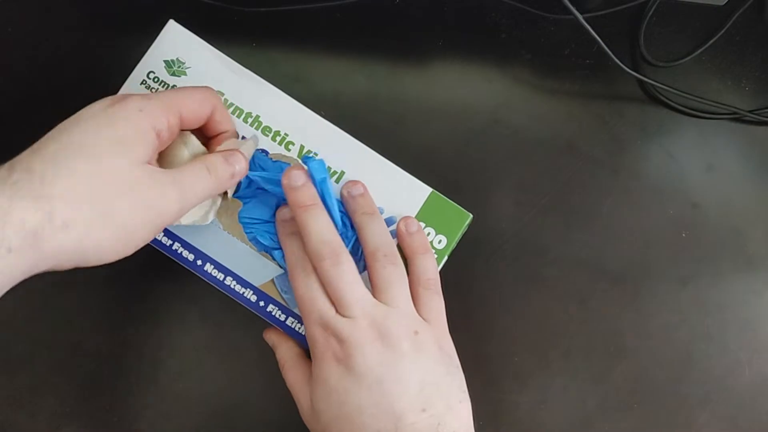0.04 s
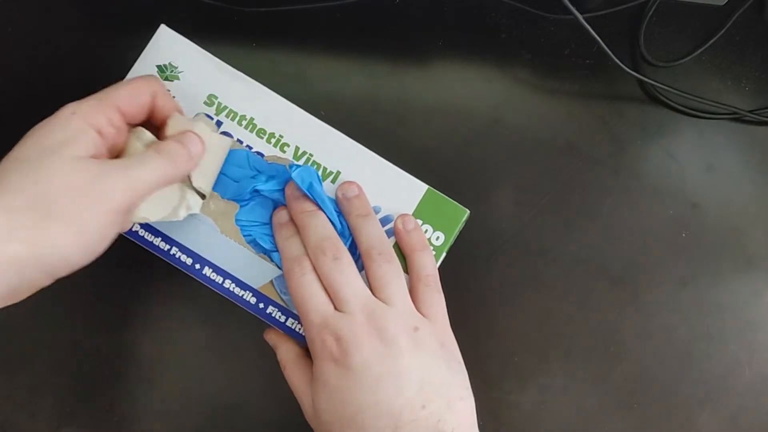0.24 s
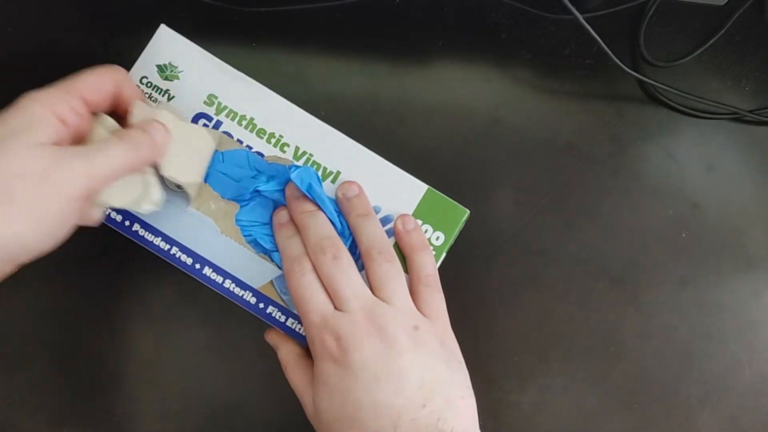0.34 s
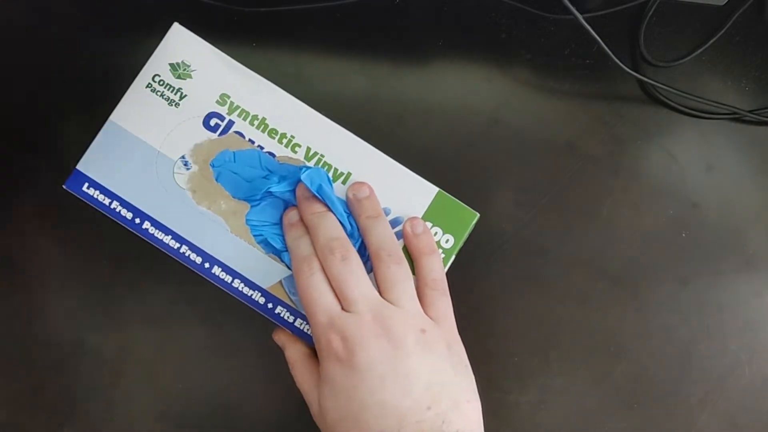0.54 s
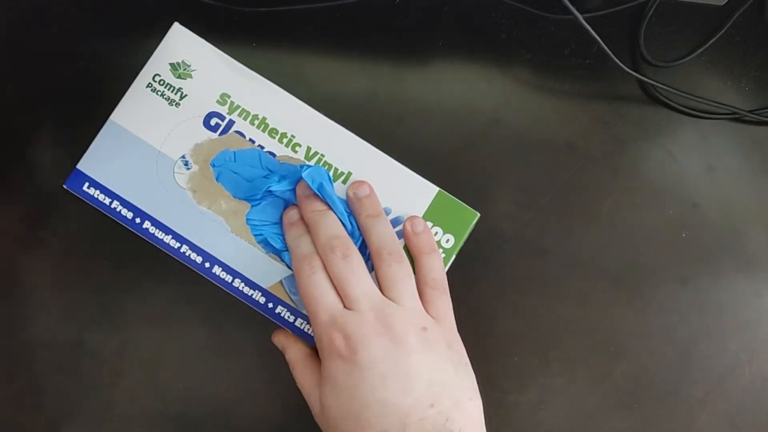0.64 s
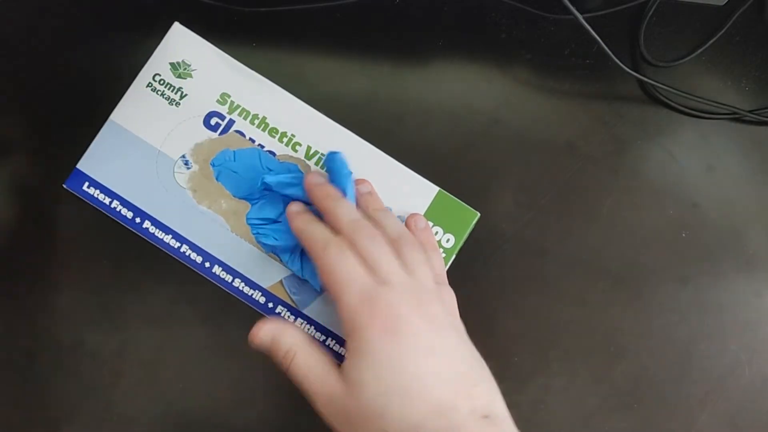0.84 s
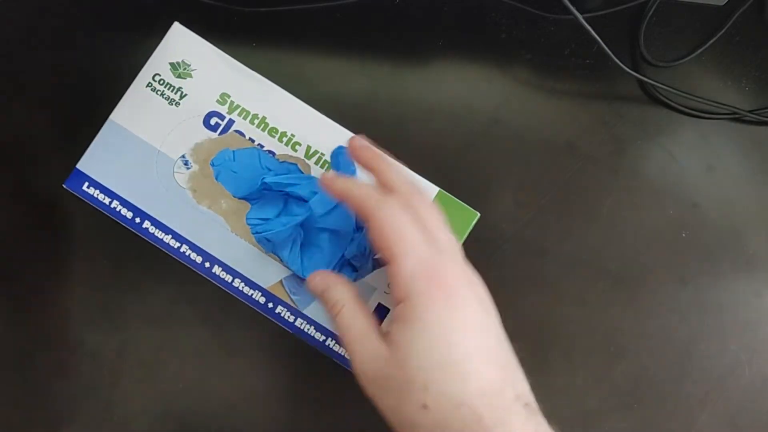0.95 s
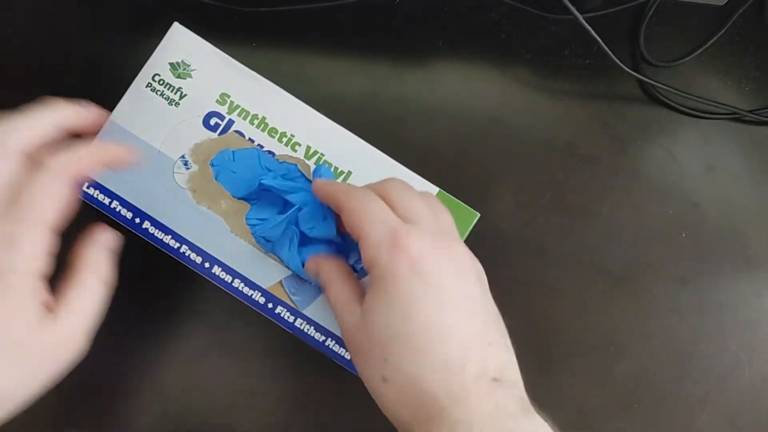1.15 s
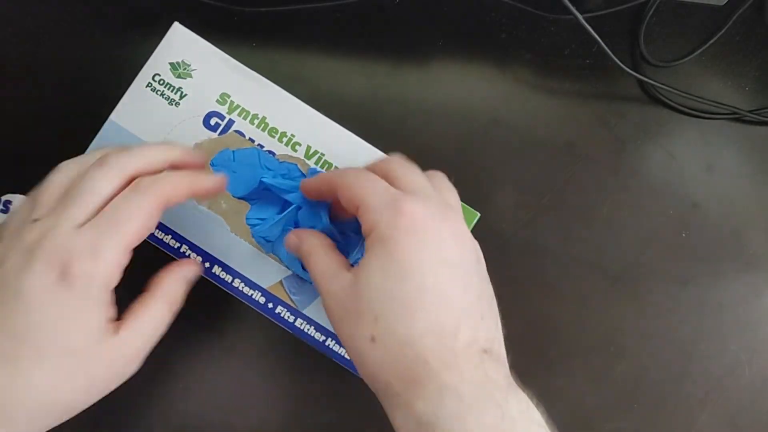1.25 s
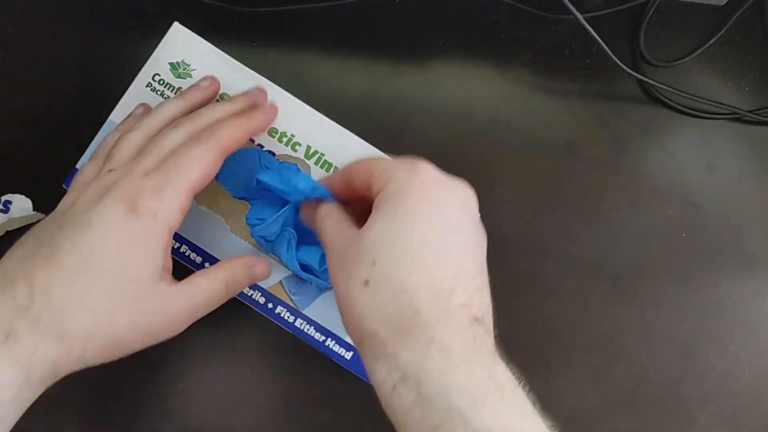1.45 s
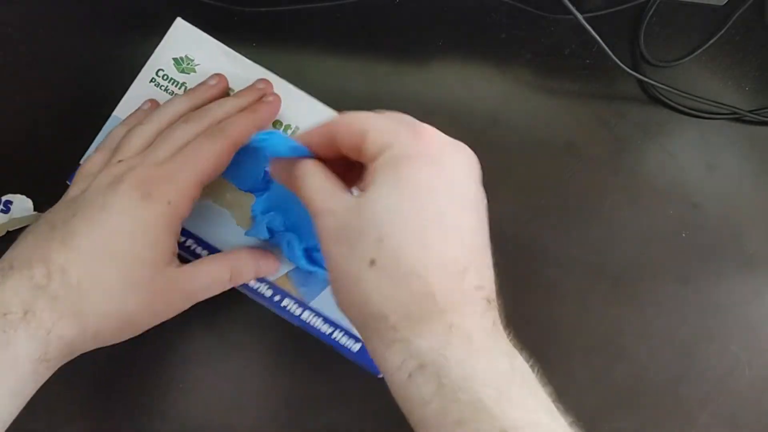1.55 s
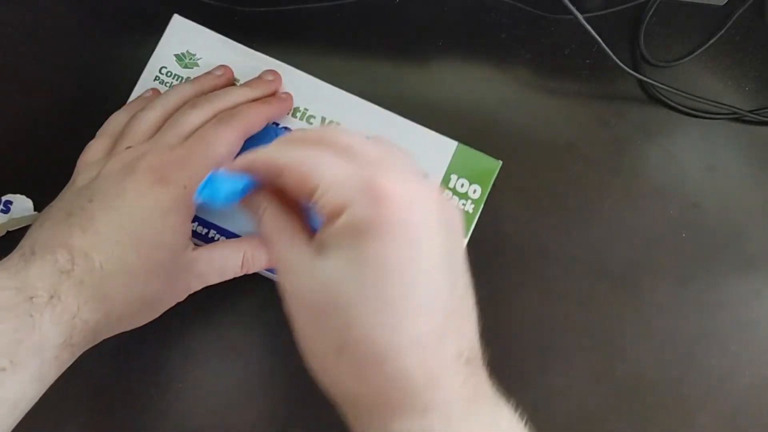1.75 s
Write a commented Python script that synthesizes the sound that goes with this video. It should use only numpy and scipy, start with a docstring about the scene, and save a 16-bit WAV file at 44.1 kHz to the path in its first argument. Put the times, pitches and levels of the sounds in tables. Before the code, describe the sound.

Close up at a desk, card tears in a rough burst ending in a loud hollow pop, then fingers lightly stir thin plastic gloves with small ticks, soft thuds and low room noise.

```python
"""A cardboard flap is torn off a box of thin plastic gloves on a desk, dropped aside, and fingers stir the gloves.
Tear and gloves are showers of tiny ringing grains; slips and jolts shake the hollow box, and snaps ring briefly.
A fuzzy whistle on the left is noise in a narrow, wandering band; soft thuds through the desk are fading low tones.
The near sounds get a faint echo of the room; low rumble and airy noise, the quiet hum of the room, lie under it all."""
import sys
import numpy as np
from scipy import signal
from scipy.fft import rfft, irfft
from scipy.io import wavfile
from scipy.ndimage import uniform_filter1d

SR = 44100
rng = np.random.default_rng(int(sys.argv[2]) if len(sys.argv) > 2 else 0)


def voltage_ratio(decibels):
    """Convert decibels (scalar or array-like) to amplitude ratios, 20 dB per decade."""
    exponent = np.asarray(decibels, float) / 20
    return 10 ** exponent


def int16_out(signal):
    """Quantize to a 16-bit WAV file."""
    q = np.round(np.clip(np.atleast_2d(signal).T, -1, 1) * 32767)
    wavfile.write(sys.argv[1], SR, q.astype(np.int16))


N = 79380  # length in samples
T = np.arange(N) / SR  # time in seconds

# crackle of tearing card, then of rustling plastic:
# (time [s], level above SPLIT_HZ [dB], level below SPLIT_HZ relative to that [dB])
CRACKLE = [(0, -67, 10.5), (.068, -65, 6), (.078, -54, -5), (.17, -50.5, -9.5), (.192, -40, -0.5),
           (.224, -41, 4.5), (.27, -38, 2.5), (.315, -45.5, 4), (.35, -33.5, -0.5), (.372, -36.5, -1.5),
           (.39, -35.5, -3.5), (.43, -30.5, 0.5), (.46, -27, 0), (.49, -45.5, -6.5), (.56, -66.5, 4.5),
           (.65, -68.5, -5), (.684, -44, -18.5), (.735, -58.5, 1), (.85, -65.5, 0), (.862, -50.5, -6),
           (.899, -52, 1), (.905, -39.5, -7), (.962, -66, 4), (1.042, -74.5, 9.5), (1.09, -63.5, -5),
           (1.132, -54, -8), (1.198, -67, -4), (1.298, -60.5, -8), (1.33, -68.5, -6), (1.426, -66.5, -20),
           (1.43, -53.5, -5), (1.47, -55, -12.5), (1.524, -63, -1), (1.544, -60, -6.5), (1.64, -66, 5.5),
           (1.67, -75.5, -8), (1.73, -75, 7), (1.745, -66.5, -0.5), (1.8, -71, 1)]
# tone colour of the tearing card: (frequency [Hz], relative level per Hz [dB])
TEAR_COLOUR = [(410, -61), (700, -13), (788, -19.5), (1040, -11), (1160, -13.5), (2450, -3.5), (3070, -8),
               (6100, -4), (7630, -11), (15200, -9), (16400, -63)]
# tone colour of the rustling gloves: (frequency [Hz], relative level per Hz [dB])
GLOVE_COLOUR = [(410, 14.5), (700, 5.5), (1200, 0), (1690, 4.5), (4050, -4), (4440, -5.5), (6770, -1.5),
                (8040, -16), (9060, -10), (15000, -12), (16400, -37)]
# how alike the tear is on left and right: (frequency [Hz], likeness [-1 to 1])
TEAR_LIKENESS = [(60, 0.95), (180, 0.97), (550, 0.093), (1650, 0.43), (4970, -0.44), (15000, 0.56)]
# side balance of the tear: (frequency [Hz], left minus right [dB])
TEAR_BALANCE = [(60, 5), (380, 0), (2380, -1), (15000, 4)]
# how far the left channel of the tear leads the right: (frequency [Hz], phase [radians])
TEAR_LEAD = [(0, 2), (2410, 0), (7490, 9), (9560, 8), (11500, 12.5), (13300, 7.5), (16200, -25)]
# how alike gloves and air are on left and right: (frequency [Hz], likeness [-1 to 1])
WIDE_LIKENESS = [(60, 1), (240, 0.99), (950, 0.21), (3770, 0.093), (15000, 0.021)]
SPLIT_HZ, GRAIN_CYCLES = 3280, 1.92
GRAINS_PER_S, GRAIN_SPREAD_DB = 500, 3  # grains a second at 3000 Hz, in proportion to pitch elsewhere
PATCH_DB, CLUMP_DB = 1.8, 1.5  # uneven level of each grain size, and of the whole crackle
TORN_S = 0.449  # the tear gives way to the gloves

# pitches of the ways the box vibrates, its modes: [Hz]
BOX_HZ = [295, 342, 354, 440, 515, 645, 695, 945, 1053, 1224, 1590]
# one row for each pitch in BOX_HZ: (level relative to its group [dB], time to fade by 60 dB [s])
BOX_RING = [(-11.5, 0.047), (9, 0.048), (-5, 0.31), (4.5, 0.093), (-10, 0.029), (-4.5, 0.1), (-14, 0.11),
            (-12.5, 0.091), (-8.5, 0.098), (-17, 0.066), (-1, 0.026)]
# shaking of the box by tear and hands, before the cuts in box():
# (time [s], middle and high modes [dB], deep modes [dB])
SHAKE = [(0.0, -56, -90), (0.064, -52, -40.5), (0.124, -54, -64), (0.21, -44, -45), (0.32, -47.5, -61),
         (0.354, -39, -72), (0.4, -28.5, -48), (0.45, -23.5, -22.5), (0.486, -62, -34.5),
         (0.56, -58.5, -65.5), (1.8, -81, -76)]
# jolts of the box, before the cut in box():
# (time [s], peak of middle modes [dB], deep relative to middle [dB], high relative to middle [dB])
JOLTS = [(0.056, -42.5, 13, -19), (.191, -39, -27, -13), (0.241, -30, -9.5, -9.5), (.349, -24, -29, -13),
         (.376, -25, -34, -2), (.381, -35.5, -19, 6), (.394, -26.5, -9, -31), (.412, -20.5, -0.5, -7.5),
         (.422, -34.5, 17, 2), (0.43, -15, -2.5, -2), (.443, -7.5, -24, -9.5), (.451, -17, 12, -4.5),
         (1.496, -47, 3.5, -12), (1.62, -48, 1, -9), (1.645, -52.5, 9, -9), (1.738, -56, 8, -4)]
DEEP_HZ, HIGH_HZ = 390, 580  # deep modes lie below the first, high modes above the second
BOX_LOW_HZ = 262  # the box gives off little below this
SLIPS_PER_S, JOLT_RISE_S = 1500, 0.0031
BOX_PAN_DB, BOX_LAG_S = 3, 0.00015  # left minus right; the left side comes later
# the hand on the box chokes the middle and deep ring after this time, down to this level
HELD_S, AFTER_DB = 0.011, -13

# short snaps: (time [s], level [dB], pitch [Hz], left minus right [dB],
# time for the ring to fade by 60 dB [s], wide tick relative to ring before the cut in snaps() [dB])
SNAPS = [(0.014, -50.5, 6850, 3, 0.027, 16), (0.0752, -38, 9830, 20, 0.0081, -5),
         (0.1046, -45.5, 4760, 2, 0.045, 9), (0.181, -39, 9300, 19, 0.01, -6),
         (0.3547, -40, 3050, 11, 0.044, 0), (0.602, -48.5, 2370, -3, 0.0066, 4),
         (0.6826, -49, 2310, 14, 0.035, -5), (0.6983, -37, 2340, 10.5, 0.03, -13),
         (0.6972, -31.5, 4120, -3.5, 0.0094, -26.5), (.784, -41, 1375, 8, 0.081, -27),
         (.784, -50, 1624, 1, 0.073, -25), (0.8104, -47.5, 3750, 8, 0.018, 8),
         (0.8703, -57, 2360, -15, 0.27, -4), (0.8996, -29.5, 2386, -14, 0.023, -13),
         (.8996, -39, 3760, 18, 0.023, -15), (0.9062, -34, 2444, -4.5, 0.089, 0),
         (1.299, -57.5, 6850, -9, 0.042, 17), (1.43, -54, 3860, 0, 0.012, 8),
         (1.452, -49.5, 2000, 6, 0.013, 19), (1.308, -51, 1720, 2, 0.012, 15),
         (1.622, -52.5, 1070, -4.5, 0.015, 3), (1.537, -47, 6760, 3, 0.038, 15),
         (1.533, -57.5, 5920, -12, 0.079, 8), (1.7365, -52, 890, 3, 0.015, -4)]
TICK_T60 = 0.009  # seconds for a tick to fade by 60 dB

# fuzzy whistle, one list for each stretch: (time [s], pitch [Hz], level [dB])
WHISTLE = [
    [(0, 1360, -47.5), (.086, 1374, -61.5), (.124, 1440, -51), (.168, 1386, -53), (.24, 1350, -51)],
    [(.56, 1340, -54.5), (.62, 1380, -65), (.7, 1310, -77), (.72, 1330, -52.5), (.75, 1394, -51),
     (.775, 1270, -61.5), (.803, 1360, -57), (.82, 1330, -53.5), (.862, 1295, -52.5), (.88, 1460, -65),
     (.897, 1376, -44), (.915, 1280, -73), (.962, 1320, -65), (.975, 1260, -60.5), (1.018, 1350, -50),
     (1.07, 1260, -64)],
]
WHISTLE_WIDTH_HZ, WHISTLE_PAN_DB = 85, 9.5  # width of one resonance; left minus right
WHISTLE_STEADY = 0.5  # 0 leaves the swells, 1 flattens them

# soft thuds through the desk: (time [s], level [dB], pitch [Hz])
THUDS = [(0.456, -50, 162), (0.647, -51.5, 71), (1.055, -44.5, 146), (1.104, -46.5, 122.7),
         (1.144, -52, 119), (1.54, -50, 63)]
THUD_T60 = 0.19  # seconds to fade by 60 dB

# fading of the room's echo: (frequency [Hz], time to fade by 60 dB [s])
ROOM = [(250, 0.14), (1000, 0.079), (4000, 0.18), (12000, 0.11)]
ROOM_DB, SNAP_ECHO_DB = -13, -7.5  # level sent to the echo: crackle and box, then snaps

# low rumble, before the cut in rumble(): (time [s], level [dB])
RUMBLE = [(0.0, -54), (0.334, -66.5), (0.466, -48.5), (0.516, -61), (0.966, -55.5), (1.062, -53),
          (1.218, -60), (1.498, -57.5), (1.8, -60)]
# tone colour of the rumble: (frequency [Hz], relative level per Hz [dB])
RUMBLE_COLOUR = [(15, -52), (25, -14), (40, -2.5), (59, 1), (125, 4.5), (236, -5), (260, 1.5), (340, -4),
                 (570, -120)]
# tone colour of the airy room noise: (frequency [Hz], relative level per Hz [dB])
AIR_COLOUR = [(110, -41), (190, -13.5), (292, 5), (520, -4), (770, -4), (1160, -14.5), (1370, -8),
              (4440, -29), (6700, -50), (7780, -54), (15200, -26), (16400, -21)]
AIR_DB, AIR_DRIFT_DB = -63, 2.0


def evened(x):
    """Scales a sound to an average strength (rms) of 1."""
    return x / np.sqrt(np.mean(x ** 2) + 1e-20)


def read(points, hz):
    """Reads a frequency table, with frequency on a log scale as the ear hears it."""
    f, value = np.transpose(points)
    return np.interp(np.log(hz + 1), np.log(f + 1), value)


def curve(rows, column=1):
    """Reads one column of a time table, sample by sample."""
    table = np.array(rows)
    return np.interp(T, table[:, 0], table[:, column])


def pan(db):
    """Gains for left and right that differ by db."""
    return voltage_ratio(np.array([[db / 2], [-db / 2]]))


def add(mix, s, sound):
    """Mixes a sound in at time s, cut off at the end of the mix."""
    part = mix[..., round(s * SR):][..., :sound.shape[-1]]
    part += sound[..., :part.shape[-1]]


def slow(per_s):
    """A wandering value of about rms 1, heading for a new random point per_s times a second."""
    count = 400
    return np.interp(T * per_s, np.arange(count), 1.2 * rng.standard_normal(count))


def clicks(per_s, spread_db, channels=1):
    """Random clicks of either sign; a few are large."""
    draw = rng.random((channels, N))
    size = rng.exponential(1, (channels, N))
    chance = per_s / SR
    on = draw < chance
    out = np.zeros((channels, N))
    out[on] = voltage_ratio(spread_db * np.minimum(size[on], 4)) * np.sign(draw[on] - chance / 2)
    return out


def resonate(x, hz, width):
    """A resonance of gain 1 whose pitch follows hz: shift down to zero, smooth, shift back up."""
    turn = np.exp(2j * np.pi * np.cumsum(hz * np.ones(len(x))) / SR)
    r = np.exp(-np.pi * width / SR)
    return 2 * (turn * signal.lfilter([1 - r], [1, -r], x / turn)).real


def coloured(pair, colour, likeness, balance=((1, 0), (2, 0)), lead=((1, 0), (2, 0))):
    """Gives two unrelated signals a tone colour, a left-right likeness, a balance and a phase lead."""
    hz = np.fft.rfftfreq(N, 1 / SR)
    a, b = rfft(pair, axis=1)
    shared = np.clip(read(likeness, hz), -1, 1)
    lean = read(balance, hz) / 2
    left = a * voltage_ratio(lean)
    right = shared * a * np.exp(-1j * read(lead, hz)) + np.sqrt(1 - shared ** 2) * b
    both = np.array([left, right * voltage_ratio(-lean)]) * voltage_ratio(read(colour, hz))
    return evened(irfft(both, N, axis=1))


def crackle():
    """Dense grains of many sizes, a few cycles each; every size comes and goes in its own patches."""
    grains = np.zeros((2, N))
    for hz in np.geomspace(650, 15500, num=14):
        train = clicks(GRAINS_PER_S * hz / 3000, GRAIN_SPREAD_DB, channels=2)
        train = train * voltage_ratio(PATCH_DB * slow(30.73))
        r = np.exp(-2 * hz / GRAIN_CYCLES / SR)
        ring = [1, -2 * r * np.cos(2 * np.pi * hz / SR), r * r]
        grains += evened(signal.lfilter([1, 0, -1], ring, train)) * np.sqrt(hz)
    tear = coloured(grains, TEAR_COLOUR, TEAR_LIKENESS, TEAR_BALANCE, TEAR_LEAD)
    gloves = coloured(grains, GLOVE_COLOUR, WIDE_LIKENESS)
    late = np.clip((T - TORN_S) / 0.033, 0, 1)  # 0 is tear, 1 is gloves
    mix = (1 - late) * tear + late * gloves
    keep_low = 1 / (1 + (np.fft.rfftfreq(N, 1 / SR) / SPLIT_HZ) ** 8)
    low = irfft(rfft(mix, axis=1) * keep_low, N, axis=1)
    both = evened(mix - low) + evened(low) * voltage_ratio(curve(CRACKLE, column=2))
    return both * voltage_ratio(curve(CRACKLE) + CLUMP_DB * slow(111.06))


def box():
    """Small slips and single soft jolts ring the modes of the hollow box, which radiates no deep bass."""
    t, out = T[:8000], np.zeros(N)
    slips = evened(clicks(SLIPS_PER_S, 2.9)[0])
    for group in (0, 1, 2):  # middle, deep, high modes
        ring = np.zeros(len(t))
        for hz, (db, t60) in zip(BOX_HZ, BOX_RING):
            if (hz < DEEP_HZ) + 2 * (hz > HIGH_HZ) == group:
                ring += voltage_ratio(db - 60 * t / t60) * np.sin(2 * np.pi * hz * t)
        ring *= np.sin(np.pi / 2 * np.minimum(t / JOLT_RISE_S, 1)) ** 2  # soft start
        if group != 2:
            ring *= np.exp(-(t / HELD_S) ** 2) + voltage_ratio(AFTER_DB)
        cut_db = (4.5, 4.5, 12.4)[group]
        shaken = slips * voltage_ratio(curve(SHAKE, column=1 + group % 2) - cut_db)
        out += signal.oaconvolve(shaken, ring / np.linalg.norm(ring))[:N]
        for s, db, deep_db, high_db in JOLTS:
            jolt_db = db + (0, deep_db, high_db)[group] - 4.0
            add(out, s, voltage_ratio(jolt_db) * ring / abs(ring).max())
    out = signal.sosfilt(signal.butter(4, BOX_LOW_HZ, "high", fs=SR, output="sos"), out)
    left = np.interp(T - BOX_LAG_S, T, out)
    return np.array([left, out]) * pan(BOX_PAN_DB)


def snaps():
    """Each snap is a short beating ring of two close pitches and a wide tick of noise."""
    out, t = np.zeros((2, N)), T[:3000]
    for s, db, hz, pan_db, t60, tick_db in SNAPS:
        tick = rng.standard_normal((2, len(t))) * voltage_ratio(tick_db - 60 * t / TICK_T60 - 11.0)
        tick = signal.lfilter([1, -0.9], [1], tick)  # brightens it
        ring = np.sin(2 * np.pi * hz * t) + 0.5 * np.sin(2 * np.pi * hz * 0.94 * t)
        ring = ring * voltage_ratio(-60 * t / t60)
        start = np.minimum(t / 0.0008, 1)
        add(out, s, voltage_ratio(db) * pan(pan_db) * start * (ring + tick))
    return out


def whistle():
    """Noise passed twice through one narrow wandering resonance, in two stretches."""
    out = np.zeros(N)
    for rows in WHISTLE:
        x = rng.standard_normal(N)
        for _ in range(2):
            x = resonate(x, curve(rows), WHISTLE_WIDTH_HZ)
        power = abs(uniform_filter1d(x ** 2, 500) + 1e-9)
        x = x / power ** (WHISTLE_STEADY / 2)  # its swells are partly evened out
        since_start = T - rows[0][0] + 0.04
        until_end = rows[-1][0] + 0.014 - T
        fade = np.clip(np.minimum(since_start, until_end) / 0.12, 0, 1)
        out += evened(x) * voltage_ratio(curve(rows, column=2)) * fade
    return out * pan(WHISTLE_PAN_DB)


def thuds():
    """Low pushes through the desk: fading low tones with a soft start."""
    out, t = np.zeros(N), T[:8000]
    for s, db, hz in THUDS:
        fade = voltage_ratio(db - 60 * t / THUD_T60) * np.minimum(t / 0.0047, 1)
        add(out, s, fade * np.sin(2 * np.pi * hz * t))
    return out


def room(x):
    """Sparse reflections of random sign, each band dying at its own speed."""
    taps = np.zeros((2, 16000))
    at = np.arange(200, 15900, 20) + rng.integers(0, 20, (2, 785))
    np.put_along_axis(taps, at, rng.choice([-1., 1.], at.shape), axis=1)
    taps[1] = taps[0] + 0.5 * taps[1]  # the two sides are partly alike
    hz, t, z = signal.stft(taps, SR, nperseg=256)
    fade = voltage_ratio(-60 * t / read(ROOM, hz)[:, None])
    tail = signal.istft(z * fade, SR, nperseg=256)[1]
    return signal.fftconvolve(x, tail / np.linalg.norm(tail[0]), axes=1)[:, :N]


def rumble():
    """Low noise that rises and falls, nearly alike on both sides."""
    noise = coloured(rng.standard_normal((2, N)), RUMBLE_COLOUR, [(60, 1.0), (200, 0.84)])
    return noise * voltage_ratio(curve(RUMBLE) - 2.5)


def air():
    """Room noise whose level drifts a little."""
    drift = uniform_filter1d(rng.standard_normal(N), 3000)
    drift = evened(uniform_filter1d(drift, 3000))
    noise = coloured(rng.standard_normal((2, N)), AIR_COLOUR, WIDE_LIKENESS)
    return noise * voltage_ratio(AIR_DB + AIR_DRIFT_DB * drift)


def scene():
    """All sources; crackle, box and snaps also get the room's echo."""
    near, snap = crackle() + box(), snaps()
    echo = room(voltage_ratio(ROOM_DB) * near + voltage_ratio(SNAP_ECHO_DB) * snap)
    return near + snap + echo + whistle() + thuds() + rumble() + air()


def low_pass(x):
    """Removes everything above the highest recorded frequency."""
    return signal.sosfilt(signal.butter(12, 16600, fs=SR, output="sos"), x)


def record(dry):
    """Turns the finished mix into the sound that is written out."""
    return low_pass(dry)


dry = scene()
out = record(dry)
int16_out(out)
```